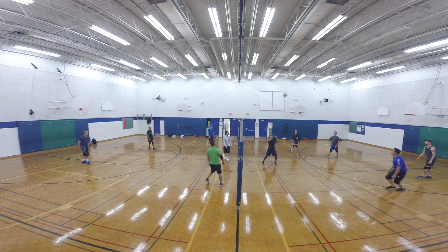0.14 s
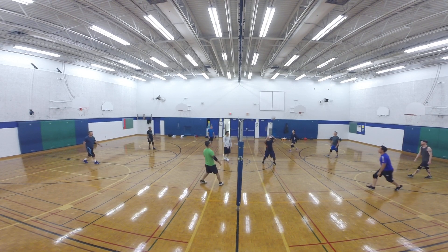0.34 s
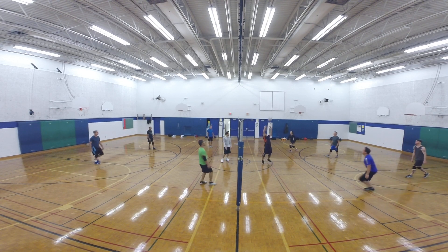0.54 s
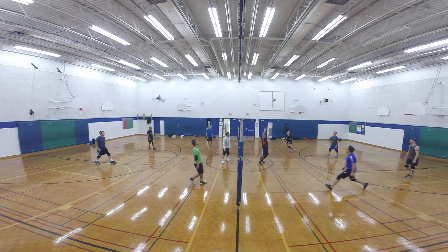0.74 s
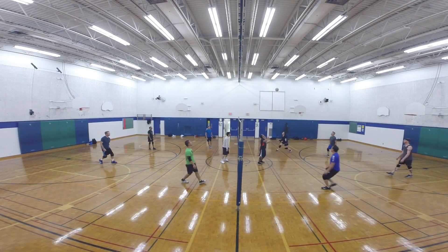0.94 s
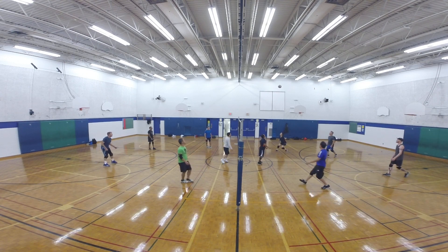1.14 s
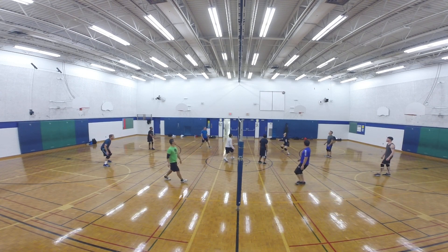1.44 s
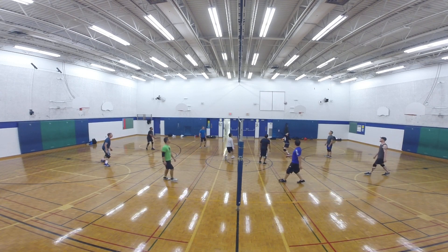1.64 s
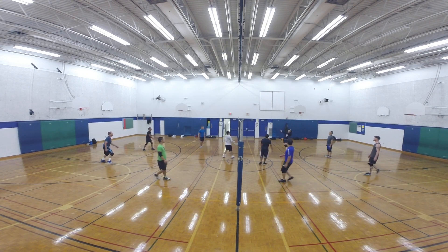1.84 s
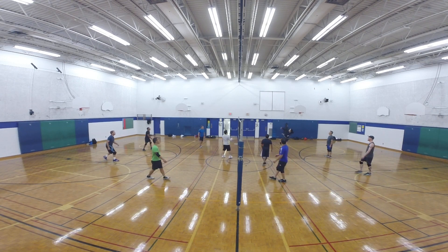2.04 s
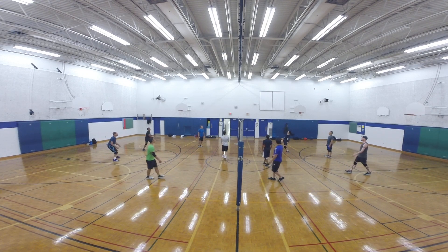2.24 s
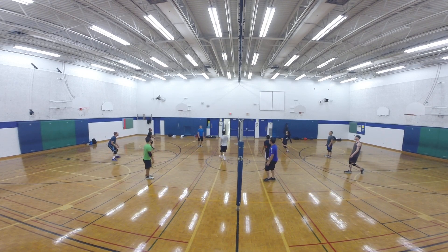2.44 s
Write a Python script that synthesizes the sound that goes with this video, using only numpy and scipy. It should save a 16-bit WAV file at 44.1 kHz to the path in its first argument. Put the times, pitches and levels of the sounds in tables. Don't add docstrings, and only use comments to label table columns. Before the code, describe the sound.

Volleyball hits in a large, hard gymnasium, heard from a distance. An earlier blow's bassy tail fades at the start over low ventilation rumble and a thin lamp whine. At 0.54 s a dull, hollow forearm pass booms and slaps off the walls. Shoes tick and thud on wood, clustered around 0.8-1.1 s, with a faint high squeak at 1.6 s. At 2.02 s a louder, sharper hand smack rings out to the end.

```python
import sys
import numpy as np
from scipy import signal
from scipy.fft import rfft, irfft
from scipy.io import wavfile
from scipy.ndimage import uniform_filter1d

SR = 44100
rng = np.random.default_rng(int(sys.argv[2]) if len(sys.argv) > 2 else 0)


def materialize(psi):
    bounded = np.clip(np.atleast_2d(psi).T, -1, 1)
    quanta = np.round(bounded * 32767).astype(np.int16)
    wavfile.write(sys.argv[1], SR, quanta)


def nominal_scale(level):
    x = np.asarray(level, float) / 20
    return 10 ** x


N = 114660
T = np.arange(N + SR) / SR - 1


def curve(table, hz):
    table = np.array(table, float)
    return np.interp(np.log(np.maximum(hz, 1)), np.log(table[:, 0]), table[:, 1])


def unit(x):
    return x / np.sqrt(np.mean(x ** 2))


def noise(gain):
    spec = rfft(rng.standard_normal(len(T)))
    hz = np.arange(len(spec)) * SR / len(T)
    return unit(irfft(spec * gain(hz), len(T)))


def fade(start, t60, rise=0.00069):
    age = np.maximum(T - start, 0)
    return (1 - np.exp(-age / rise)) * nominal_scale(-60 * age / t60)


def ring(start, hz, t60):
    return fade(start, t60) * np.sin(2 * np.pi * hz * (T - start))


def walk(rate):
    hold = int(SR / rate)
    levels = np.repeat(rng.standard_normal(len(T) // hold + 1), hold)
    smooth = uniform_filter1d(uniform_filter1d(levels, hold), hold)
    return unit(smooth[:len(T)])


def struck(gain, start, size=4096):
    cepstrum = irfft(np.log(gain(np.arange(size // 2 + 1) * SR / size + 1)))
    cepstrum[1:size // 2] *= 2
    cepstrum[size // 2 + 1:] = 0
    out, at = np.zeros(len(T)), int((start - T[0]) * SR)
    out[at:at + size] = irfft(np.exp(rfft(cepstrum)))
    return out


# pitch in Hz, time to lose 60 dB in seconds.
HALL_T60 = [(40, 1.55), (120, 3.41), (300, 2), (1000, 2.64), (2500, 2.62), (5000, 0.98), (9000, 0.91),
            (15000, .45)]
# pitch in Hz, build-up time in seconds.
HALL_RISE = [(40, 0.062), (200, 0.022), (1000, 0.0067), (15000, 0.018)]


def hall(x):
    tail = 0
    for hz in 30 * 2 ** np.arange(0, 9.1, .5):
        band = noise(lambda f: np.maximum(1 - abs(2 * np.log2((f + 1) / hz)), 0) ** .5)
        envelope = fade(T[0], curve(HALL_T60, hz), curve(HALL_RISE, hz))
        tail = tail + np.sqrt(hz / 3000) * band * envelope
    return signal.fftconvolve(x, tail)[:len(T)]


def echoes_of(x, table):
    return sum(nominal_scale(db) * np.roll(x, int(lag * SR)) for lag, db in table)


def ball_ring(start, modes, skin_db, slap):
    def gain(f):
        power = sum(nominal_scale(2 * db) / (1 + ((f / hz - hz / f) * hz / width) ** 2) ** 2 for hz, db, width in modes)
        return np.sqrt(power + nominal_scale(2 * (skin_db + curve(slap, f))))
    return struck(gain, start)


def crack_snap(start, scatter_db, contact_s, crack, ring_hz, near):
    contact = (T > start) * np.exp(-np.maximum(T - start - contact_s, 0) / 0.0014)
    scatter = sum(nominal_scale(db) * fade(start + lag, 0.053, 0.0015) for lag, db in near[2:])
    hiss = noise(lambda f: nominal_scale(curve(crack, f)) * (f > 900))
    return hiss * (contact + nominal_scale(scatter_db) * scatter) + nominal_scale(-2) * ring(start, ring_hz, 0.049)


def blow(row, hit, contact_s, modes, skin_db, slap, crack, ring_hz, direct_db, near, echoes):
    (start, ring_db, send_db), (crack_db, scatter_db) = row, hit
    ball = nominal_scale(ring_db) * ball_ring(start, modes, skin_db, slap)
    snap = crack_snap(start, scatter_db, contact_s, crack, ring_hz, near)
    body = nominal_scale(direct_db) * signal.lfilter(*signal.butter(2, 1600, fs=SR), ball)
    boom = signal.lfilter(*signal.butter(2, [90, 227], "band", fs=SR), ball)
    tail = nominal_scale(-26 + send_db) * hall(ball)
    return body + nominal_scale(crack_db) * snap + echoes_of(body, near) + echoes_of(boom, echoes) + tail


# start in seconds, ring level in dB, level sent to the hall in dB.
BLOWS = [
    (-.6, 6, 0),
    (.5432, 14.5, -6),
    (2.0226, 20, -1),
]
# crack level in dB, scattered crack level in dB.
CRACKS = [
    (-40, -8),
    (-36, -6.5),
    (-29, -7.5),
]
# pitch in Hz, level in dB, width in Hz.
PASS_MODES = [(75.6, -34, 28), (150, 1.5, 87), (316, -22.5, 75), (451, -9, 200), (620, -11, 450),
              (833, -12.5, 130), (960, -9, 40), (1204, -21.5, 1200), (1790, -58, 170)]
# pitch in Hz, level in dB.
PASS_SLAP = [(300, 42), (1500, -4.5), (3000, -1.5), (5500, 6.5), (8000, -9), (11000, -17.5), (15000, -26)]
# pitch in Hz, level in dB.
HARD_SLAP = [(300, 16.5), (1500, 2.5), (3000, 2), (5500, -1), (8000, -10), (11000, -20), (15000, -32.5)]
# pitch in Hz, level in dB.
PASS_CRACK = [(900, 7), (2000, 2.5), (3200, 3), (3800, -4), (5300, -3), (6200, -9.5), (10000, -19.5),
              (15000, -34)]
# delay in seconds, level in dB.
PASS_NEAR = [(.004, 1.5), (.0075, -16), (0.01, 5), (.0165, -53), (0.021, -6), (.034, 0)]
# delay in seconds, level in dB.
PASS_ECHOES = [(0.05, 15), (0.056, 13.5), (0.07, 12.5), (.118, 3), (0.152, 2), (0.195, 12), (0.41, 7.5)]


def forearm_passes():
    direct_db = 4
    earlier = blow(BLOWS[0], CRACKS[0], .007, PASS_MODES, -27.5, HARD_SLAP,
                   PASS_CRACK, 3090, direct_db, PASS_NEAR, PASS_ECHOES)
    dull = blow(BLOWS[1], CRACKS[1], .007, PASS_MODES, -44, PASS_SLAP,
                PASS_CRACK, 3040, direct_db, PASS_NEAR, PASS_ECHOES)
    return earlier + dull


# pitch in Hz, level in dB.
AIR = [(20, -4), (60, 4), (130, -8), (350, -4), (1100, -13), (6000, -26.5), (11000, -37), (15000, -59.5)]


def air():
    whine_hz, whine_width_hz = 5980, 300
    whine = noise(lambda f: 1 / (1 + ((f - whine_hz) / whine_width_hz * 2) ** 2))
    rumble = noise(lambda f: nominal_scale(curve(AIR, f)))
    return nominal_scale(-51 + 0.5 * walk(7.07)) * rumble + nominal_scale(-72 + 1.6 * walk(6.44)) * whine


def scuffs(count=100):
    middle_hz, cycles = 2590, 30
    out, age = np.zeros(len(T)), np.arange(1024) / SR
    for when, pitch, size in rng.random((count, 3)):
        hz = middle_hz * 2 ** (2.6 * (pitch - .5))
        at = int(when * (len(T) - 1024))
        level_db = -60 - 2.9 * np.log(size + 0.16) - 7.6 * np.log2(hz / middle_hz)
        fall = nominal_scale(level_db - 60 * age * hz / cycles)
        rise = np.minimum(age * hz / 3, 1)
        out[at:at + 1024] += fall * np.sin(2 * np.pi * hz * age) * rise
    return out


def squeak(start):
    pitch_hz = 8090 * (1 + .014 * walk(110))
    slips_hz = 51.9 * (1 + 0.19 * walk(40.4))
    slips = np.cos(np.pi * np.cumsum(slips_hz) / SR) ** 2
    release = 1 + np.exp(np.clip((T - start - 0.22) / 0.009, -50, 50))
    gate = fade(start, 0.94, 0.0017) / release
    return nominal_scale(-50.5 + 3.3 * walk(60)) * gate * slips * np.sin(2 * np.pi * np.cumsum(pitch_hz) / SR)


# start in seconds, tick level in dB, tick pitch in Hz,
# thud level in dB, thud pitch in Hz.
STEPS = [(-.04, -17, 4970, -39, 298), (.154, -21, 2350, -37, 140), (0.817, -16, 2780, -30, 408),
         (0.849, -24.5, 4700, -40.5, 136), (.868, -26, 4980, -23.5, 145), (.8872, -13, 2960, -27.5, 150),
         (.988, -29, 3400, -46, 141), (1.04, -22, 2190, -38, 307), (1.074, -17.5, 2040, -20, 1490),
         (1.285, -15.5, 1920, -27.5, 295), (1.464, -21.5, 3240, -24, 232), (1.57, -20, 2430, -33.5, 267),
         (1.606, -19, 2620, -30, 213), (1.716, -12, 1520, -24.5, 620), (1.9155, -19.5, 2690, -31, 620)]


def shoes():
    ticks = 0
    thuds = nominal_scale(-17) * ring(.8868, 820, .022)
    for start, tick_db, tick_hz, thud_db, thud_hz in STEPS:
        tick = struck(lambda f: np.exp(-(np.log(f / tick_hz) / 0.54) ** 2) + .001, start)
        ticks = ticks + nominal_scale(tick_db) * tick
        thuds = thuds + nominal_scale(thud_db) * ring(start, thud_hz, 8 / thud_hz)
    steps_tail = nominal_scale(-42) * hall(ticks + nominal_scale(-7.5) * thuds)
    rubber = squeak(1.606)
    return ticks + thuds + steps_tail + rubber + nominal_scale(-52) * hall(rubber)


# pitch in Hz, level in dB, width in Hz.
SMACK_MODES = [(59, -2.5, 22), (97.2, 2, 94), (154.5, -5.5, 56), (309, -10, 60), (556.5, -21, 140),
               (787, -20, 600), (973, -10.5, 32), (1038, -12.5, 93), (1330, -26.5, 310), (2220, -28, 190),
               (3120, -28.5, 240)]
# pitch in Hz, level in dB.
SMACK_CRACK = [(900, -2), (1900, -34), (2700, 16.5), (3500, 8), (6000, -5), (11000, -8.5), (15000, -25)]
# delay in seconds, level in dB.
SMACK_NEAR = [(.003, 1.5), (.009, 2), (0.011, 2.5), (0.015, -1), (.022, -5), (0.024, -8), (0.035, -3)]
# delay in seconds, level in dB.
SMACK_ECHOES = [(.042, 15.6), (.057, 11.4), (.069, 15.4), (0.138, 15), (.167, 4), (0.233, 15), (0.323, 4.4)]


def hand_smack():
    return blow(BLOWS[2], CRACKS[2], .0048, SMACK_MODES, -33, HARD_SLAP,
                SMACK_CRACK, 2780, 5.5, SMACK_NEAR, SMACK_ECHOES)


def scene():
    mix = forearm_passes() + air() + scuffs() + shoes() + hand_smack()
    return mix[None, SR:]


def low_pass(x):
    return signal.sosfilt(signal.butter(12, 15750, fs=SR, output="sos"), x)


def record(dry):
    no_top = signal.sosfilt(signal.ellip(8, .2, 60, 15100, fs=SR, output="sos"), dry)
    mix = signal.lfilter(*signal.butter(2, 39.6, "high", fs=SR), no_top)
    return low_pass(mix)


dry = scene()
out = record(dry)
materialize(out)
```